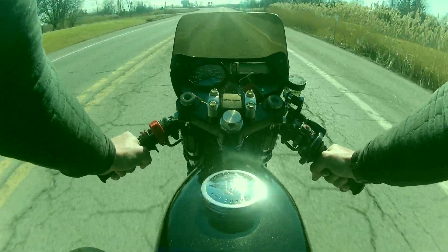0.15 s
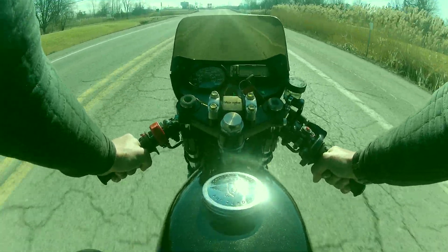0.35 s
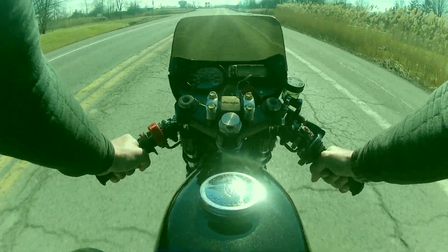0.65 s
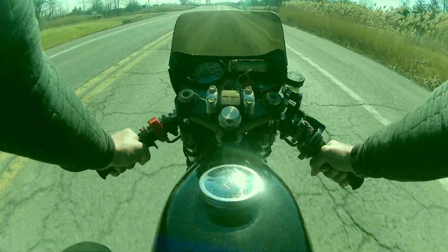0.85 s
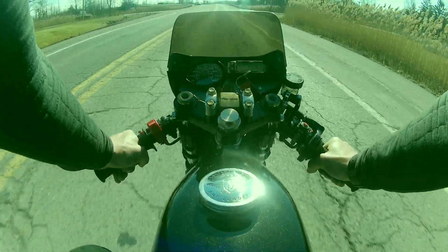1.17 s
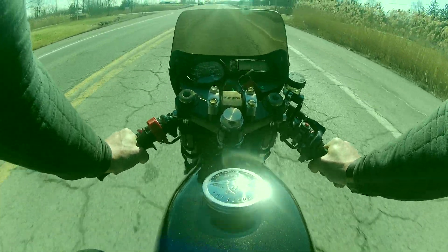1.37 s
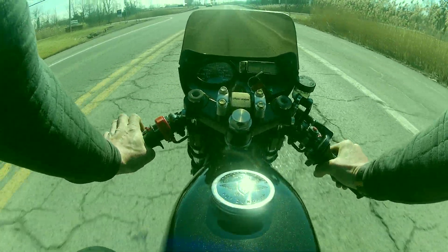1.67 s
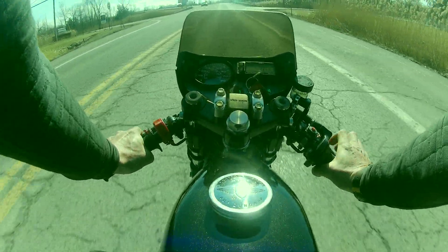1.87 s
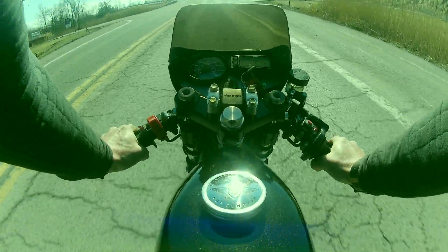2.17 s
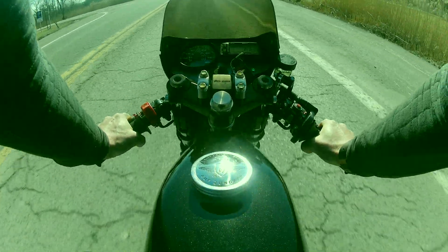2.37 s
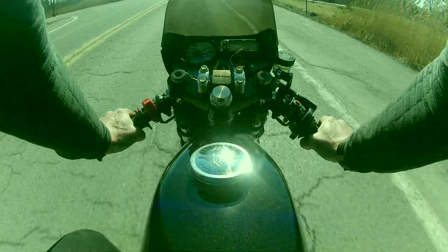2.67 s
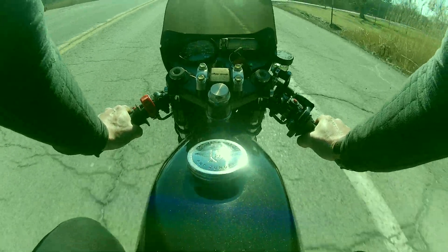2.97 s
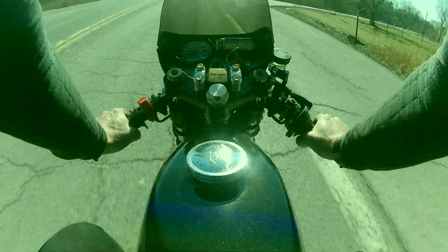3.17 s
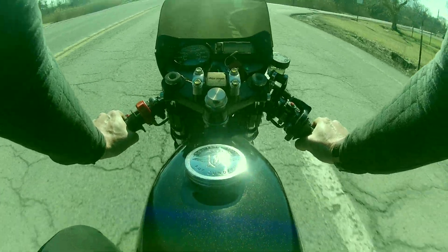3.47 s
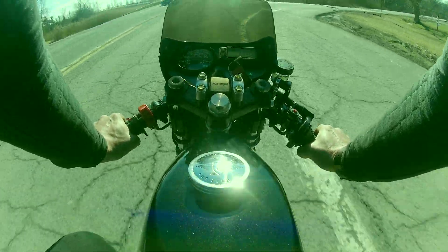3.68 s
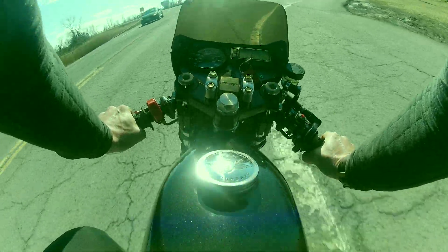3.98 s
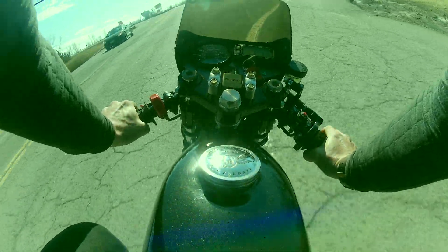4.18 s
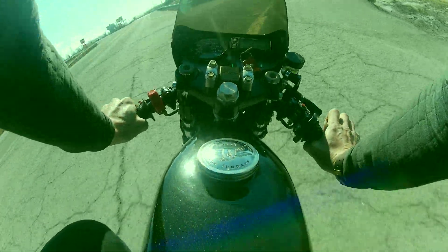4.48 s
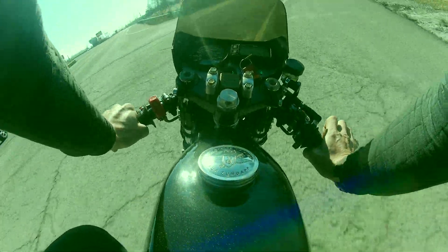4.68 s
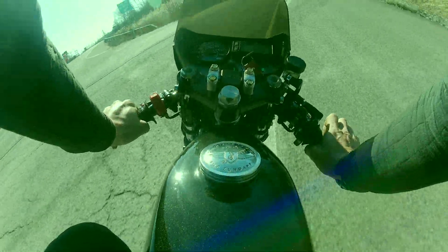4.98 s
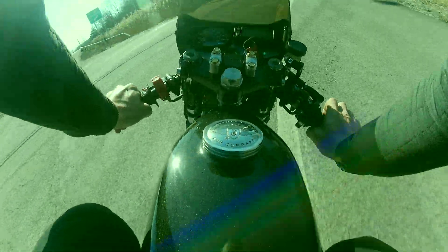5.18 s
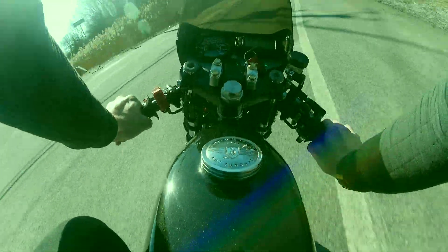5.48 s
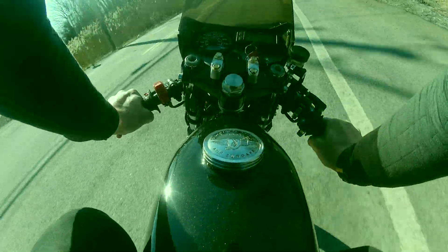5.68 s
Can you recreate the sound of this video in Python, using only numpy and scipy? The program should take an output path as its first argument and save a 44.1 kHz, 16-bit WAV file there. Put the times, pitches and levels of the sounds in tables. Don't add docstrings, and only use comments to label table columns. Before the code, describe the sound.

From 0 to 1.5 s a small two-stroke motorbike buzzes close by, nasal and raspy, firing rapidly as its pitch sinks gradually. A thin steady panel hum around 1.4 kHz fades within the first half second. Wind buffets the microphone housing with low rumble and rushing air, and tyres drum softly. Near 1.4 s the engine swells in a short blip, then the throttle closes at 1.5 s. Until 4.5 s it coasts: weak ragged ticking falling slowly in pitch, irregular dull exhaust pops, stronger gusts around 2 to 3 s, and faint wavering whistles, the clearest sinking near 3.25 s. Wind thins to a lull by 4.45 s. At about 4.55 s the engine catches loudly, stutters through brief misfires until 5.1 s, then smooths into a hard, rising buzz with metallic ring and hiss, still climbing at 5.8 s. The sound is muffled, slightly clipped, dry and outdoors.

```python
import sys
import numpy as np
from scipy import signal
from scipy.fft import rfft, irfft, next_fast_len
from scipy.io import wavfile
from scipy.ndimage import uniform_filter1d

SR = 44100
rng = np.random.default_rng(int(sys.argv[2]) if len(sys.argv) > 2 else 0)


def materialize(psi):
    bounded = np.clip(np.atleast_2d(psi).T, -1, 1)
    quanta = np.round(bounded * 32767).astype(np.int16)
    wavfile.write(sys.argv[1], SR, quanta)


def boost_factor(decibels):
    exponent = np.asarray(decibels, float) / 20
    return 10 ** exponent


N = 257544
TIME = np.arange(N) / SR

# [t/s, f/Hz]
CRANK_SPEED = [(0, 163.5), (.1, 162.5), (.2, 156.2), (.45, 148.6), (.77, 137.9), (1.0, 134.3), (1.2, 133.2),
               (1.38, 133.4), (1.49, 139), (1.66, 126.4), (1.95, 119.6), (4.1, 106.1), (4.52, 105.1),
               (4.77, 112.8), (5.27, 125.7), (5.4, 129.8), (5.6, 132.9), (5.84, 144.8)]
PICKUP_S = 4.5515
# [from t/s, to t/s, clean firing level/dB]
COAST = (1.505, 4.546, -2)
# [from t/s, to t/s, level/dB]
MISFIRES = [(4.576, 4.612, -21), (4.631, 4.667, -21), (4.686, 4.713, -22.5), (4.741, 4.759, -22),
            (4.759, 4.768, -10), (4.794, 4.812, -9), (4.847, 4.856, -12), (4.899, 4.907, -13),
            (4.943, 4.950, -13), (4.984, 4.992, -13), (4.992, 4.999, -5), (5.085, 5.092, -14)]
# [t/s, peak level/dB]
POPS = [(1.6062, -20), (2.167, -27), (2.2166, -22), (2.2948, -14.5), (2.351, -28.5), (2.4537, -39.5),
        (2.645, -22.5), (2.6833, -15), (2.8695, -19), (3.1158, -14), (3.1945, -20.5), (3.2834, -20),
        (3.7915, -29.5), (3.8876, -16), (4.21, -20), (4.3096, -15.5), (4.5134, -24.5)]
# [t/s, burn level/dB, long-pipe load level/dB]
THROTTLE = [(0, -30, 2.5), (.25, -33.5, 9.5), (.65, -27.5, -5.5), (1.07, -29.5, -3), (1.33, -28, 1),
            (1.41, -23.5, 6.5), (1.48, -21, -6.5), (1.505, -43.5, -8), (1.9, -46.5, 0.5), (2.38, -35, 12),
            (2.6, -42.5, 6.5), (4.1, -49.5, 5), (4.535, -40, 8.5), (4.56, -16.5, -6.5), (4.9, -19.5, -4),
            (5.41, -16.5, 4), (5.73, -18.5, 2), (5.84, -22.5, 3)]
# [from t/s, raggedness 0-1]
STAGES = [
    (0, .07),
    (.85, .1),
    (1.51, .4),
    (4.54, .13),
    (5.02, .07),
]
# [airborne ring level/dB, middle pipe level/dB, intake level/dB]
STAGE_VOICE = [(0.5, 3.5, -33), (-1, -22.5, -27.5), (14, -8.5, -29.5), (2, -7, -25), (-2, -9.5, -36.5)]
STAGE_BLEND_S = .04

# [f/Hz, width f/Hz, level/dB]
LONG_PIPE = [(550, 130, -4), (722, 59, -1), (966, 162, 3), (1179, 82, 10.5)]
LONG_PIPE_LAG_S = 0.0012
# [f/Hz, width f/Hz, level/dB]
MIDDLE_PIPE = [(1332, 47, 0.00069)]
# [f/Hz, width f/Hz, level/dB]
SHORT_PIPE = [(1407, 164, 2.5), (1635, 585, -7)]
# [f/Hz, width f/Hz, level/dB]
INTAKE_BOX = [(131, 120, -5.5), (276, 22, -14.5), (518, 140, -6), (815, 34, 0), (1152, 110, -2.5)]
# [f/Hz, width f/Hz, level/dB]
LEFT_RING = [(2160, 370, 3.5), (2244, 81, 2), (2593, 170, -8.5), (4270, 600, -16.5)]
# [f/Hz, width f/Hz, level/dB]
RIGHT_RING = [(1850, 180, 4.5), (2307, 41, 6.5), (2480, 170, 0), (3075, 140, 1), (3750, 100, 2.5),
              (4020, 710, -1.5)]
RING_PER_HZ = 0.29
# [f/Hz, width f/Hz, level/dB]
FIN_RING = [(5400, 80, -6), (5900, 350, 0), (7000, 400, -10)]

# [t/s, level/dB]
WIND = [(0, -41), (.7, -40), (1.4, -40.5), (1.9, -40.5), (2.4, -37.5), (3.3, -39.5), (3.7, -43.5),
        (4.2, -46.5), (4.45, -52.5), (4.7, -45.5), (5.2, -44.5), (5.84, -48.5)]
# [t/s, level/dB, half width t/s]
GUSTS = [(.04, 4, 0.068), (1.06, 3, .04), (1.38, -0.5, 0.073), (1.889, 6, 0.028), (2.34, 2, 0.061),
         (2.57, 6.5, 0.054), (2.2, 2.5, 0.18), (3.1, 2.5, 0.29), (3.76, 5.5, 0.036), (3.95, 4, 0.024),
         (4.5, 3, 0.11), (5.22, 0.5, 0.044), (5.84, -6, 0.17)]
# [f/Hz, level/dB per Hz]
BUFFET = [(8.8, -23.5), (15, -3), (81, -2.5), (236, -13.5), (300, -6.5), (390, -41.5), (660, -120)]
# [f/Hz, level/dB per Hz]
RUSH = [(120, -33), (200, -11), (346, -3), (404, -13.5), (462, -11), (741, -7.5), (809, -13.5),
        (999, -21.5), (1190, -3.5), (1920, -27.5), (2000, -30), (2600, -68), (4400, -120)]
# [f/Hz, level/dB per Hz]
HISS = [(1900, -12), (2240, -6.5), (2680, -8), (3050, -2.5), (3420, -2.5), (3840, -10), (4210, -16.5),
        (4700, -28.5), (5300, -34), (6500, -38.5), (9000, -52)]
# [f/Hz, level/dB]
HISS_LEFT = [(1900, 8.5), (2400, 12), (3000, -14.5), (4000, -25), (5300, -5.5), (6000, -23), (9000, -13)]
BUFFET_FOLLOWS, HISS_FOLLOWS = 0.55, 0.41
GAS_HISS_DB, GAS_HISS_PER_HZ = -23, 0.39
# [t/s, level/dB]
ROAD = [(0, -29), (.9, -23.5), (1.8, -23), (4, -37.5), (5.5, -48.5), (5.84, -29)]

PANEL_HZ, PANEL_WIDTH_HZ, PANEL_DB, PANEL_FADE_S = 1365, 2.8, -20, 0.42
# [t/s, f/Hz, glide f/Hz per s, level/dB, half length t/s]
WHINES = [
    (1.673, 1913, -700, -42, .08),
    (2.35, 3164, -200, -46.5, 0.19),
    (2.592, 2275, -46.5, -44, 0.56),
    (3.251, 2225, -280, -39.5, .27),
    (3.8, 2174, -100, -45.5, 0.19),
]
# [f/Hz, level/dB]
LEFT_PORT = [(25, 0), (70, .6), (240, 2), (450, .5), (1000, 1), (1400, -2), (1600, -8), (1780, -20),
             (2000, -14)]
PORT_LAG_S, PORT_LEAK_HZ, AIR_LAG_S = .00016, 44, .00052


def rms_one(x):
    return x / np.sqrt(np.mean(x ** 2) + 1e-20)


def in_time(rows):
    s, *columns = np.transpose(rows)
    return [np.interp(TIME, s, column) for column in columns]


def at_hz(points, hz):
    table_hz, table_db = np.array(points).T
    return np.interp(np.log(hz), np.log(table_hz), table_db)


def drift(rate):
    step = 40
    r = np.exp(-2 * np.pi * step * rate / SR)
    white = rng.standard_normal(N // step + 2002)
    slow = signal.lfilter([1], [1, -2 * r, r * r], white)[2000:]
    return np.interp(np.arange(N) / step, np.arange(len(slow)), rms_one(slow))


def resonate(x, modes):
    out = 0
    for k, (hz, width, db) in enumerate(modes):
        r = np.exp(-np.pi * width / SR)
        b = (1 - r * r) / 2 * np.array([1, 0, -1])
        a = [1, -2 * r * np.cos(2 * np.pi * hz / SR), r * r]
        out = out + (-1) ** k * boost_factor(db) * signal.lfilter(b, a, x)
    return out


def cut(x, hz, kind, order=4):
    return signal.sosfilt(signal.butter(order, hz, kind, fs=SR, output="sos"), x)


def noise(spectrum, patchy_db, rate):
    low, high = spectrum[0][0], spectrum[-1][0]
    edges = low * 2 ** np.arange(0, np.log2(high / low) + .01, 1 / 3)
    white = rng.standard_normal((2, N))
    together, out = drift(rate), 0
    for k, (a, b) in enumerate(zip(edges, edges[1:])):
        band = cut(white[k % 2], [a, b], "band", order=2)
        flicker_db = patchy_db * (1.2 * together + drift(rate))
        out = out + band * boost_factor(at_hz(spectrum, np.sqrt(a * b)) + flicker_db)
    return out


def once_a_turn(turns, size=1, wander=0):
    at = np.flatnonzero(np.diff(np.floor(turns))) + 1
    overshoot = turns[at] % 1 / (turns[at] - turns[at - 1])
    moment = np.clip(at - overshoot + wander, 0, N - 2)
    whole, part = moment.astype(int), moment % 1
    clicks = np.zeros(N)
    clicks[whole] = size * (1 - part)
    clicks[whole + 1] += size * part
    return clicks * np.sqrt(SR / 130)


def scatter(x, paths_ms, share):
    for lag in (np.array(paths_ms) * SR / 1000).astype(int):
        taps = np.zeros(lag + 1)
        taps[0], taps[-1] = np.clip(share, 0, .9), 1
        x = signal.lfilter(taps, taps[::-1], x)
    return x


def by_stage():
    starts, ragged = np.array(STAGES).T
    stage = np.searchsorted(starts, TIME, "right") - 1
    rows = np.column_stack([ragged, STAGE_VOICE])
    return uniform_filter1d(rows[stage].T, int(STAGE_BLEND_S * SR), axis=1)


def crank_turns(speed):
    turns = np.cumsum(speed) / SR
    return turns - np.interp(PICKUP_S, TIME, turns)


def firings(turns, ragged):
    cycle = (np.floor(turns) - np.floor(turns[0])).astype(int)
    at = np.flatnonzero(np.diff(cycle)) + 1
    strength, timing = rng.standard_normal((2, len(at)))
    db = np.minimum(7 * ragged[at] * strength, 3)
    for start, end, down_db in MISFIRES:
        db = db + down_db * ((TIME[at] > start) & (TIME[at] < end))
    coast_start, coast_end, coast_db = COAST
    coasting = (TIME[at] > coast_start) & (TIME[at] < coast_end)
    blows = once_a_turn(turns, boost_factor(db + coast_db * coasting), 4 * ragged[at] * timing)
    puffs = np.append(1, boost_factor(db))[cycle] * np.exp(-1.5 * (turns % 1)) * rng.standard_normal(N)
    return blows, puffs


def exhaust_gas(turns, ragged):
    burn_db, _ = in_time(THROTTLE)
    blows, puffs = firings(turns, ragged)
    return boost_factor(burn_db + 22.5) * (blows + 3 * ragged * puffs) + pops()


def exhaust_and_intake(gas, turns, ragged, middle_db, intake_db):
    _, load_db = in_time(THROTTLE)
    longer = np.interp(TIME - LONG_PIPE_LAG_S, TIME, gas * boost_factor(load_db - 11.5))
    shorter = resonate(gas, [(1376, 372, 0.96)])
    note = resonate(shorter, SHORT_PIPE) + resonate(longer, LONG_PIPE)
    note = note + resonate(gas * boost_factor(middle_db), MIDDLE_PIPE)
    note = note - 0.27 * resonate(note, [(778, 150, 0.0027)])
    note = scatter(note, paths_ms=[.6], share=.4)
    uneven = np.clip((ragged - .07) / .03, 0, 1)
    note = note + uneven * (scatter(note, paths_ms=[2.3], share=.65) - note)
    intake = boost_factor(intake_db + 16.0) * once_a_turn(turns)
    return cut(note + resonate(intake, INTAKE_BOX), 2020, "low", order=8)


def airborne_ring(gas, speed, ring_db):
    level_db = ring_db - 25 + RING_PER_HZ * (speed - 135)
    right = scatter(gas * boost_factor(level_db), paths_ms=[1.1, 1.9, 3.1], share=.55)
    left = scatter(np.interp(TIME - AIR_LAG_S, TIME, right), paths_ms=[.9], share=0.93)
    ring = np.array([resonate(left, LEFT_RING), resonate(right, RIGHT_RING)])
    ring = cut(cut(ring, 1720, "high"), 3996, "low", order=8)
    fins = resonate(resonate(np.array([left, right]), FIN_RING), [(5930, 500, 0)])
    return ring + fins * boost_factor([[-30], [-18]])


def engine():
    speed, = in_time(CRANK_SPEED)
    ragged, ring_db, middle_db, intake_db = by_stage()
    turns = crank_turns(speed)
    gas = exhaust_gas(turns, ragged)
    note = exhaust_and_intake(gas, turns, ragged, middle_db, intake_db)
    return note, airborne_ring(gas, speed, ring_db)


def airflow():
    (wind_db,), (speed,), (burn_db, _) = in_time(WIND), in_time(CRANK_SPEED), in_time(THROTTLE)
    gust_db = sum(db * np.exp(-((TIME - s) / width) ** 2) for s, db, width in GUSTS)
    swing_db = wind_db + 42
    buffet_db = -36.5 + BUFFET_FOLLOWS * swing_db + gust_db
    gas_db = burn_db + GAS_HISS_DB + GAS_HISS_PER_HZ * (speed - 135)
    hiss = np.hypot(boost_factor(-46 + HISS_FOLLOWS * swing_db), boost_factor(gas_db))
    return buffet_db, wind_db, 20 * np.log10(hiss)


def wind_and_road():
    buffet_db, rush_db, hiss_db = airflow()
    buffet_db = buffet_db + 14.5 - 0.16 * (TIME + 1.0)
    buffet = boost_factor(buffet_db) * rms_one(noise(BUFFET, patchy_db=0.0, rate=3.3))
    rush = boost_factor(rush_db + 14) * rms_one(noise(RUSH, patchy_db=.8, rate=20))
    drumming = cut(rng.standard_normal(N), [105, 230], "band", order=2)
    road = boost_factor(in_time(ROAD)[0]) * rms_one(drumming)

    left_spectrum = [(hz, db + at_hz(HISS_LEFT, hz)) for hz, db in HISS]
    left = noise(left_spectrum, patchy_db=1.5, rate=35.0)
    right = noise(HISS, patchy_db=1.5, rate=23.0)
    hiss = boost_factor(hiss_db - 1) * np.array([left, right]) / np.std(right)
    fins = resonate(rng.standard_normal((2, N)), FIN_RING) * boost_factor([[-12], [0]])
    hiss = hiss + boost_factor(hiss_db - 7.5) * fins
    left_rush = cut(rng.standard_normal(N), [260, 480], "band", order=2)
    left_rush = boost_factor(rush_db - 1.5) * rms_one(left_rush)
    return buffet + rush + road, hiss + left_rush * [[1], [0]]


def panel():
    narrow = resonate(rng.standard_normal(N), [(PANEL_HZ, PANEL_WIDTH_HZ, 0)])
    hum = resonate(narrow, [(PANEL_HZ, 30, 0)])
    return boost_factor(PANEL_DB) * np.exp(-(TIME / PANEL_FADE_S) ** 4) * rms_one(hum)


def pops():
    clicks = np.zeros(N)
    for s, db in POPS:
        clicks[round(s * SR)] = boost_factor(db + 32.0)
    return clicks


def gears():
    waver = 2 * np.pi * np.cumsum(9 * drift(15)) / SR
    out = 0
    for s, hz, glide, db, half_s in WHINES:
        t = TIME - s
        swell = boost_factor(db) * np.exp(-(t / half_s) ** 2)
        out = out + swell * np.sin(2 * np.pi * (hz + glide * t / 2) * t + waver)
    return out * boost_factor(1.7 * drift(8))


def left_port(x):
    size = next_fast_len(N + 4096)
    hz = np.fft.rfftfreq(size, 1 / SR) + 1e-3
    delay = np.exp(-2j * np.pi * hz * PORT_LAG_S)
    leak = 1 / (1 - 1j * PORT_LEAK_HZ / hz)
    port = -boost_factor(at_hz(LEFT_PORT, hz)) * delay * leak
    return irfft(rfft(x, size) * port, size)[:N]


def scene():
    note, ring = engine()
    wind, hiss = wind_and_road()
    housing = note + wind + panel()
    whine = gears() * [[1], [.4]]
    return np.array([left_port(housing), housing]) + ring + whine + hiss


def roll_off(x):
    return signal.sosfilt(signal.butter(12, 11400, fs=SR, output="sos"), x)


def record(dry):
    muffled = cut(dry, 7900, "low", order=6)
    clipped = np.clip(muffled, -.78, .78)
    mix = cut(clipped, 7600, "low", order=3)
    return roll_off(mix)


dry = scene()
out = record(dry)
materialize(out)
```